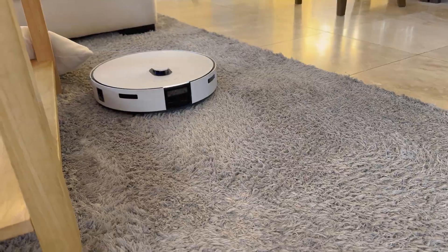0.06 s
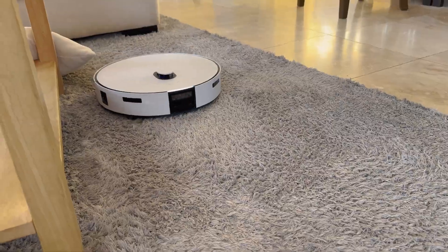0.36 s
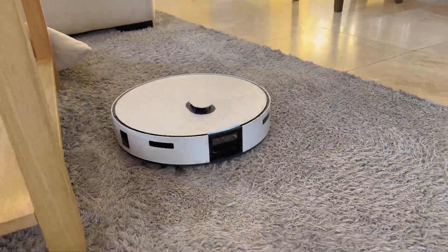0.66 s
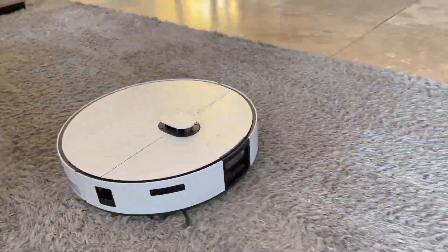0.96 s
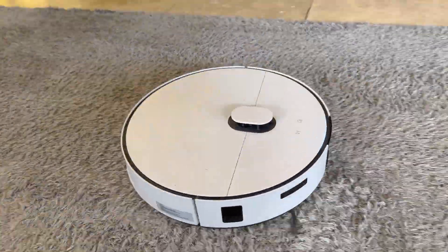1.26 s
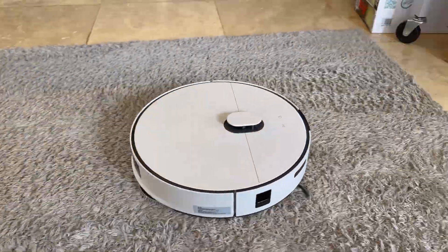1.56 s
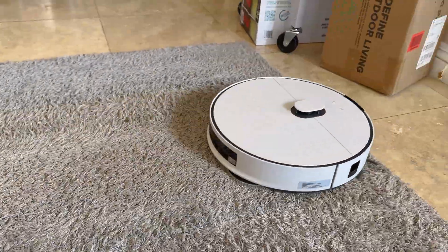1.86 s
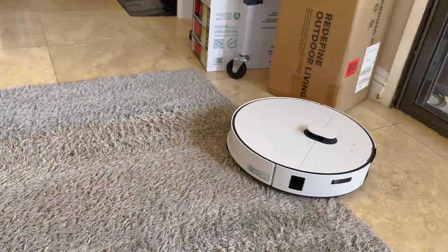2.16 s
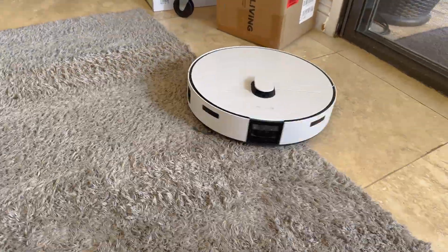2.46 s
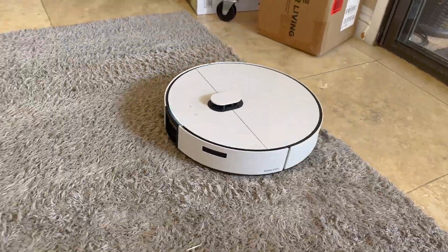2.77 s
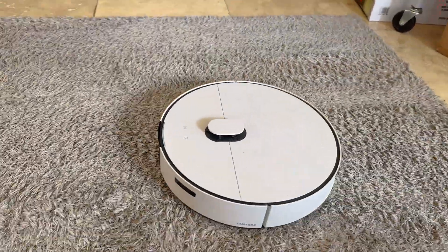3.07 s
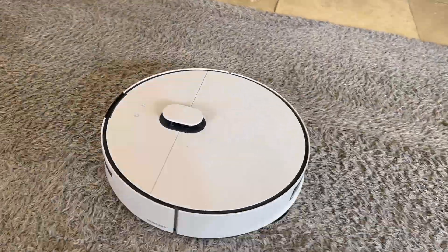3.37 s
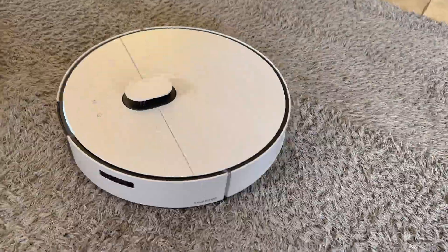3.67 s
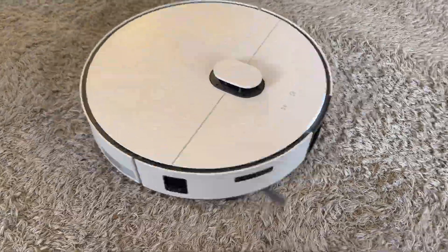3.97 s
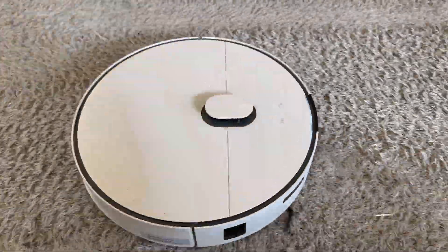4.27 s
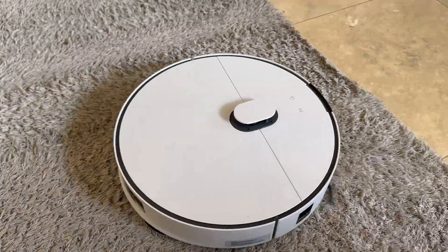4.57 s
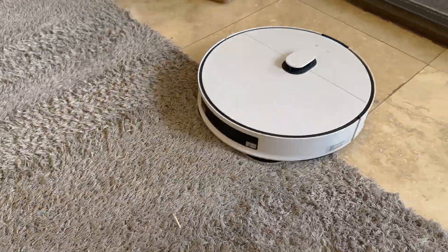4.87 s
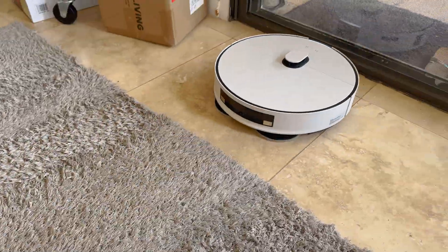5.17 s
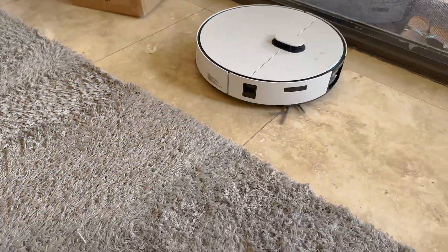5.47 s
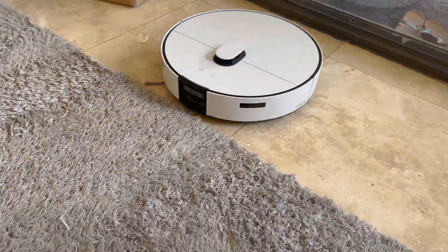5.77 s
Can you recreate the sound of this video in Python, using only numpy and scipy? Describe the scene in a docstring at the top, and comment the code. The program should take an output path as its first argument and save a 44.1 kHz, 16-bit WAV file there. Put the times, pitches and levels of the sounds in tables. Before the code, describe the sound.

A quiet, low appliance hum is heard for the first half second, then cuts abruptly to a robot vacuum about a metre away in a room, slightly to the right. Its steady rush of air and hiss continues to the end, with a thin high fan whine, breathy gliding whistles and a faint brush motor hum. From about 1 to 2.4 seconds the wheels thud softly on the rug, and sharp ticks of grit go up the intake until 2 seconds. At about 2.1 seconds the whine drops as the robot rolls onto tile, rising again at 2.7 as it returns and the exhaust hiss swells. The whir is closer around 3.7 seconds. More grit clicks between 4.2 and 4.7 seconds, sharpest near 4.4. At about 5 seconds the whine drops again with a soft bump, and the hiss sweeps as the robot turns on tile until 6 seconds.

```python
"""Robot vacuum on rug and tile

A low appliance hum gives way abruptly to a robot vacuum driving over a rug and twice out onto tile. Its fan
whines, faster on the rug; turbulent air roars in the ducts, rings the gap under the shell and whistles along
the floor. The exhaust hiss swells and sweeps as the robot turns. The brush motor hums, the bristles flutter,
soft thuds come and go, and grit ticks up the intake."""
import sys
import numpy as np
from scipy import signal
from scipy.fft import rfft, irfft, next_fast_len
from scipy.io import wavfile

SR = 44100
rng = np.random.default_rng(int(sys.argv[2]) if len(sys.argv) > 2 else 0)


def store_wav(level_fs):
    """Save 16-bit WAV to argv[1]."""
    pcm = np.round(np.clip(np.atleast_2d(level_fs), -1, 1) * 32767)
    wavfile.write(sys.argv[1], SR, pcm.T.astype(np.int16))


N = 264688
TIME = np.arange(N) / SR


def from_db(db):
    """Amplitude ratio: tenfold for every 20 dB."""
    return 10 ** (np.asarray(db) / 20)


def rms_one(x):
    """Normalisation to unit power."""
    return x / np.sqrt(np.mean(np.abs(x) ** 2) + 1e-20)


def in_time(rows):
    """Linear interpolation of each column at every sample."""
    s, *columns = np.transpose(rows)
    return [np.interp(TIME, s, c) for c in columns]


def at_hz(rows, hz):
    """Interpolation of each column on a log-frequency axis."""
    points, *columns = np.transpose(rows)
    return [np.interp(np.log(np.maximum(hz, 1)), np.log(points), c) for c in columns]


def step(at_s, ramp_s):
    """A smooth transition from 0 to 1."""
    return .5 + .5 * np.tanh((TIME - at_s) / ramp_s)


def phase_of(hz):
    """Phase is the time integral of frequency."""
    return 2 * np.pi * np.cumsum(hz + np.zeros(N)) / SR


def delayed(x, lag_samples):
    """Propagation delay over a changing path."""
    return np.array([np.interp(np.arange(N) - lag_samples, np.arange(N), port) for port in x])


def drift(rate_hz):
    """Low-pass Gaussian noise: a smooth fluctuation of spread 1."""
    stride, settle = 8, 4000
    pole = np.exp(-2 * np.pi * stride * rate_hz / SR)
    white = rng.standard_normal(N // stride + settle + 2)
    slow = signal.lfilter([1], [1, -2 * pole, pole * pole], white)[settle:]
    return np.interp(np.arange(N) / stride, np.arange(len(slow)), rms_one(slow))


def at_ports(right, diffuse, ports, hz):
    """Partial coherence: the left microphone port mixes the right's wave with diffuse sound."""
    balance_db, coherence, lead = at_hz(ports, hz)
    coherence = np.clip(coherence, 0, 1)
    left = coherence * np.exp(1j * lead) * right + np.sqrt(1 - coherence ** 2) * diffuse
    return np.array([from_db(balance_db) * left, right])


def noise(spectrum, ports):
    """Spectrally shaped stereo noise, rms 1 on the right."""
    size = next_fast_len(N, real=True)
    hz = np.arange(size // 2 + 1) * SR / size
    right, diffuse = rfft(rng.standard_normal((2, size))) * from_db(at_hz(spectrum, hz)[0])
    pair = irfft(at_ports(right, diffuse, ports, hz), size)[:, :N]
    return pair / np.std(pair[1])


def tone(hz, ports, scatter, rate_hz):
    """Multipath fading: reflections make a tone's level and phase wander at each port."""
    balance_db, _, lead = at_hz(ports, np.mean(hz))
    phase = phase_of(hz)
    left, right = [(1 + scatter * drift(rate_hz)) * np.cos(phase + shift + scatter * drift(rate_hz))
                   for shift in (lead, 0)]
    return np.array([from_db(balance_db) * rms_one(left), rms_one(right)])


# echoes off floor and furniture: delay_s, relative_db
REFLECTIONS = [(.0011, -12), (.0029, -11.5), (.0047, -28), (.0083, -9)]

def echoes(x, strength_db, wander=0.0433):
    """Comb filtering by short echoes, whose paths change as robot and listener move."""
    out, power = x.copy(), 1
    for delay_s, level_db in REFLECTIONS:
        gain = from_db(level_db + strength_db)
        out += gain * delayed(x, delay_s * SR * (1 + wander * drift(.25)))
        power += gain ** 2
    return out / np.sqrt(power)


# motor rumble: frequency_hz, density_db
RUMBLE_SPECTRUM = [(25, -29), (60, -7), (110, -5.5), (190, -4.5), (260, 0), (330, -2.5), (420, 8.5),
                   (520, 2.5), (800, -1), (1250, -8), (2100, -10.5), (2750, -16.5), (3300, -13),
                   (4300, -12.5), (7200, -19), (12500, -33), (14500, -48)]
# motor tones: pitch_hz, level_db
MOTOR_TONES = [(74, -67), (150.7, -62), (243, -56), (293.6, -58), (441.4, -50.5), (570.4, -60), (621, -64),
               (701, -63), (732, -51.5), (823.6, -62), (1109, -68), (1707, -63.5), (2121, -64.5),
               (3828, -66), (3898, -66), (5082, -69), (7154, -70)]
# stereo image: frequency_hz, left_minus_right_db, coherence, left_lead_rad
APPLIANCE_IMAGE = [(148, -11, 0.6, 2), (298, -6, 1, 0.5), (424, -4.5, 1, 0.7), (750, -9, 0.37, 1.6),
                   (1740, -3, 0.48, 3.5), (2940, -8.5, 0.19, -3), (6700, -13, 0.25, 10),
                   (10850, 0.5, 1, 1.3)]

def appliance():
    """A motor radiates a line spectrum of unsteady tones over a broadband rumble."""
    tones = sum(from_db(level_db) * tone(hz, APPLIANCE_IMAGE, scatter=0.38, rate_hz=13)
                for hz, level_db in MOTOR_TONES)
    return from_db(-44) * echoes(noise(RUMBLE_SPECTRUM, APPLIANCE_IMAGE), strength_db=-8) + tones


# stereo image of room hum and robot: frequency_hz, left_minus_right_db, coherence, left_lead_rad
ROBOT_IMAGE = [(124, -4, 1, 1), (256, 3, 0.8, -1.5), (404, -6, 0.62, 1.5), (770, -9.5, 1, -2.5),
               (920, -22, 0.66, 1.5), (1070, -13.5, 0.5, 1.9), (1190, -9.5, 1, 0.67), (1380, -7.5, 1, 0.88),
               (2250, -6, 0.97, 0.5), (3300, -6.5, 0.82, 1.33), (5200, -8, 0, 0.5), (8840, -9, 0.7, 4.5),
               (10500, -7.5, 1, 4.5), (12600, -11.5, 0.8, 5), (16100, -7.5, 0.45, 2)]

def room_hum(tile, pitch_hz=151, level_db=-81, tile_rise_db=3):
    """A faint tone with slow multipath fading, stronger toward the tiled side."""
    gain = from_db(level_db + tile_rise_db * tile)
    return gain * tone(pitch_hz, ROBOT_IMAGE, scatter=0.46, rate_hz=0.49)


# robot to listener: time_s, distance_m
RANGE = [(.5, 1.3), (.75, 1.17), (1.22, 0.88), (1.6, 1.02), (1.95, 1.15), (2.22, 1.15), (2.65, 1.58),
         (3.0, 1.22), (3.65, 0.74), (4.35, 0.85), (4.62, 0.98), (4.88, 0.91), (5.08, 1.02), (5.3, 0.93),
         (5.52, 1.01), (5.7, 0.9), (6.0, 1.21)]
# trips onto tile: leave_rug_s, back_on_rug_s, brush_hum_db
TILE_VISITS = [(2.083, 2.7, -78.5), (4.94, 6.005, -66.5)]
# turns that show the exhaust, side brush or rear vents: centre_s, half_length_s, squareness
EXHAUST_VIEWS = [(2.8, 0.49, 0.99), (5.42, 0.47, 0.15), (6.0, 0.08, 0.85)]
BRUSH_VIEWS = [(1.3, 0.13, 0.1), (1.85, 0.27, 0.95), (4.55, 0.38, 0.8)]
REAR_VIEWS = [(3.05, 0.04, 0.2), (3.62, 0.42, 0.4), (4.76, 0.11, 0.12)]
LEAVE_S, RETURN_S = .07, .05   # the motors ease off and pick up

def drive():
    """Source geometry, or pose: distance, share on tile, and how squarely each side is in view."""
    tile = sum(step(leave_s, LEAVE_S) * (1 - step(back_s, RETURN_S))
               for leave_s, back_s, _ in TILE_VISITS)
    views = [sum(share * np.exp(-((TIME - s) / half_s) ** 2) for s, half_s, share in turns)
             for turns in (EXHAUST_VIEWS, BRUSH_VIEWS, REAR_VIEWS)]
    return in_time(RANGE)[0], tile, *views


def radiated(levels, pose, falloff=1, beam=1):
    """Directivity and spreading loss; a larger beam narrows the exhaust's lobe."""
    rug_db, tile_db, exhaust_db, brush_db, rear_db = levels
    metres, tile, exhaust, brush, rear = pose
    directivity_db = exhaust_db * exhaust ** beam + brush_db * brush + rear_db * rear
    return from_db(rug_db + tile_db * tile + directivity_db) / metres ** falloff


# soft thuds: start_s, level_db
THUDS = [(0.971, -54.5), (1.035, -55), (1.28, -53.5), (1.345, -56), (1.41, -57), (1.761, -59),
         (1.83, -56.5), (1.975, -53), (2.024, -60), (2.17, -60), (2.355, -56), (3.295, -60), (4.66, -64),
         (5.02, -57), (5.31, -60)]
# their spectrum: frequency_hz, density_db
THUD_SPECTRUM = [(50, -26), (150, -22), (270, 6), (400, 3), (650, 6), (1100, -5), (2500, -34)]
# their stereo image: frequency_hz, left_minus_right_db, coherence, left_lead_rad
THUD_IMAGE = [(200, 7, 0.18, 0), (1000, 0, 0.54, 0)]

def soft_thuds(attack_s=0.0023, decay_s=0.017):
    """Soft, dull, heavily damped thuds, deepest and strongest at the left port."""
    envelope = sum(from_db(level_db) * step(s, attack_s) * np.exp(-np.maximum(TIME - s, 0) / decay_s)
                   for s, level_db in THUDS)
    return envelope * noise(THUD_SPECTRUM, THUD_IMAGE)


def ring(x, hz, t60_s):
    """A damped mode that radiates no deep bass; a unit impulse rings it at height 1."""
    pole, angle = from_db(-60 / (t60_s * SR)), 2 * np.pi * hz / SR
    numerator = np.array([1, -2, 1]) / (2 * np.tan(angle / 2))
    return signal.lfilter(numerator, [1, -2 * pole * np.cos(angle), pole * pole], x + 1e-18)


# grains hitting the intake: start_s, peak_db, ring_hz, knock_db
GRAINS = [(.5325, -35, 5500, -50), (.9585, -25.5, 2400, -33), (1.2052, -23, 2200, -31),
          (1.3306, -31, 3070, -34), (1.3325, -25.5, 7000, -50), (1.378, -28, 5400, -48),
          (1.4032, -23, 3600, -32.5), (2.0212, -28, 9000, -38), (2.0268, -20, 6100, -43),
          (2.0270, -17.5, 9100, -28), (4.245, -31, 6500, -48), (4.2989, -23, 5200, -36),
          (4.378, -29, 5800, -48), (4.4423, -15.5, 5000, -26), (4.659, -31, 6200, -40),
          (5.8104, -31, 6000, -57)]
# plastic shell: pitch_hz, gain_db, t60_s
SHELL_MODES = [(318, -30, 0.035), (560, -27, 0.13), (985, -25, 0.14), (1420, -4.5, 0.037),
               (2120, -5, 0.011), (2720, -3, 0.018), (4330, -17, 0.0063)]

def grit(crack_s=.00045, ring_s=0.0014, tail_db=-23, tail_s=0.011, echo_s=.0021, echo_db=-10):
    """Impact excitation: each grain cracks, with a faint scatter and floor echo, and rings the shell."""
    t = TIME[:SR // 16]
    cracks, knocks = np.zeros((2, N + len(t))), np.zeros(N)
    envelope = np.exp(-t / crack_s) + from_db(tail_db) * np.exp(-t / tail_s)
    for start_s, peak_db, hz, knock_db in GRAINS:
        at = round(start_s * SR)
        dull = signal.butter(3, min(1.7 * hz, 10500), fs=SR, output="sos")   # bigger grains are duller
        crack = signal.sosfilt(dull, ring(rng.standard_normal((2, len(t))) * envelope, hz, ring_s))
        cracks[:, at:at + len(t)] += from_db(peak_db) * crack / np.abs(crack).max(axis=1, keepdims=True)
        knocks[at] = from_db(knock_db)
    cracks += from_db(echo_db) * np.roll(cracks, round(echo_s * SR), axis=1)
    # finite contact time dulls the knock
    knocks = signal.sosfilt(signal.butter(2, 3000, fs=SR, output="sos"), knocks)
    shell = sum(ring(knocks * from_db(gain_db), hz, t60_s) for hz, gain_db, t60_s in SHELL_MODES)
    return (cracks[:, :N] + shell) * from_db([[-7], [0]])


def brush_motor(metres, tile, rug_hz=192.6, tile_hz=169.4, drag=.025, clear_s=0.15):
    """Frictional loading: the pile drags and muffles the brush; clear of the rug it hums steadily."""
    wobble = drag * (1 - tile) * drift(1.2) + 0.0015 * drift(5.9)
    speed_hz = (rug_hz + (tile_hz - rug_hz) * tile) * (1 + wobble)
    hum, overtone = from_db(-77), from_db(-65) / metres
    for leave_s, back_s, hum_db in TILE_VISITS:
        clear = step(leave_s + clear_s, RETURN_S) * (1 - step(back_s - clear_s, RETURN_S))
        hum = hum + from_db(hum_db) * clear
    return sum(gain * tone(order * speed_hz, ROBOT_IMAGE, scatter=0.2, rate_hz=6.8)
               for order, gain in ((2, hum), (4, overtone)))


def resonance(hz, width_hz):
    """A resonance driven by turbulence gives narrow-band noise about its centre."""
    carrier = np.exp(1j * phase_of(hz))
    right, diffuse = [(drift(width_hz) + 1j * drift(width_hz)) * carrier for _ in range(2)]
    return np.real(at_ports(right, diffuse, ROBOT_IMAGE, np.mean(hz)))


def glide(width_hz, curve, fade_s=.02):
    """A swept resonance fades in, slides in pitch and fades out."""
    hz, level_db = in_time(curve)
    sounding = step(curve[0][0], fade_s) * (1 - step(curve[-1][0], fade_s))
    return sounding * from_db(level_db) * resonance(hz, width_hz)


# gap modes: pitch_hz, width_hz, rug_at_1m_db, then the changes tile_db, exhaust_db, brush_db, rear_db
GAP_RESONANCES = [(1307, 52, -59.5, -0.5, 4, 11, 16), (1635, 34, -60, 0.5, 2, 5.5, 3),
                  (2007, 59, -52.5, -28, -13, -13, -4)]
# breathy whistles: width_hz, [(time_s, pitch_hz, level_db)]
SEAL_WHISTLES = [(150, [(.45, 4300, -57), (.62, 4530, -53), (.85, 4640, -48.5), (.96, 4350, -52),
                 (1.06, 4020, -49.5), (1.55, 3930, -46.8), (2.0, 3740, -51)]), (50, [(.48, 2210, -53),
                 (.65, 2190, -48), (.9, 2100, -52), (1.2, 1990, -50)]), (400, [(1.12, 4950, -59),
                 (1.35, 5050, -49), (1.45, 4900, -55), (2.1, 4850, -58)]), (260, [(2.26, 2850, -49),
                 (2.55, 2550, -50), (2.85, 2450, -51)]), (180, [(2.74, 3700, -56), (2.87, 4040, -48),
                 (3.12, 4060, -45.5), (3.3, 3920, -49), (3.55, 3760, -52)]), (60, [(3.68, 3900, -58),
                 (3.82, 4150, -54), (3.9, 4370, -48.5), (3.96, 4400, -50.5)]), (170, [(4.04, 3930, -52),
                 (4.4, 4050, -49), (4.62, 4300, -46), (4.8, 4620, -44.5), (4.92, 4500, -55)]),
                 (70, [(4.72, 1330, -51), (4.86, 1430, -50), (4.96, 1630, -47), (5.08, 1690, -53)]),
                 (45, [(2.3, 1620, -57), (2.65, 1640, -50), (2.9, 1680, -54)]), (70, [(2.76, 1400, -54),
                 (2.9, 1320, -49), (3.1, 1270, -52)]), (130, [(4.95, 4000, -53), (5.05, 3700, -54),
                 (5.14, 3000, -54), (5.32, 2800, -52)]), (210, [(5.58, 3000, -53), (5.7, 3080, -48),
                 (5.82, 3100, -52)]), (170, [(5.72, 2850, -54), (5.82, 2580, -48), (5.89, 2200, -45.5),
                 (6.04, 2000, -48)]), (260, [(5.78, 3850, -52), (5.815, 4050, -48.5), (5.85, 4800, -51),
                 (5.91, 5150, -51), (6.04, 5280, -48)]), (80, [(5.87, 1660, -51), (6.04, 1620, -50)])]

def under_shell(pose):
    """Flow excites the gap's resonances; whistles glide as the intake's seal with the floor changes."""
    modes = sum(radiated(levels, pose, falloff=0.86) * resonance(hz, width_hz)
                for hz, width_hz, *levels in GAP_RESONANCES)
    whistles = sum(glide(width_hz, curve) for width_hz, curve in SEAL_WHISTLES)
    return signal.sosfilt(signal.butter(2, 500, "high", fs=SR, output="sos"), modes + whistles)


# floor echo as the robot turns by the tile: time_s, notch_hz, echo_gain
FLOOR_NOTCH = [(2.7, 3400, 0), (2.85, 3000, 0.3), (3.0, 2280, 0.22), (3.15, 2000, 0), (4.95, 1600, 0.12),
               (5.2, 2090, 0.35), (5.45, 2420, 0.49), (5.62, 2300, 0.3), (5.8, 1650, 0.27),
               (5.9, 1510, 0.3)]

def off_floor(x):
    """Destructive interference: the floor echo is half a cycle late at the notch."""
    notch_hz, gain = in_time(FLOOR_NOTCH)
    return (x + gain * delayed(x, SR / (2 * notch_hz))) / np.sqrt(1 + gain ** 2)


# notches that slide as the robot turns: width_hz, [(time_s, centre_hz, depth)]
SLIDING_NOTCHES = [(454, [(5.28, 3550, 0.13), (5.42, 3420, 0.4), (5.55, 3400, 0.5), (5.62, 3500, 0.2)]),
                   (900, [(5.15, 5200, 0.18), (5.45, 4900, 0.45), (5.72, 5400, .45), (5.86, 5700, 0.25)]),
                   (595, [(5.82, 3500, 0), (5.9, 3050, 0.2), (6.0, 2850, 0.2)]), (800, [(2.1, 4900, 0),
                   (2.35, 4670, 0.5), (2.68, 4380, 0.15), (2.8, 4500, 0.2)]), (500, [(2.7, 3500, 0),
                   (2.9, 3100, 0), (3.4, 3000, 0.47), (4.35, 3020, 0.42), (4.8, 3080, 0.2)])]

def notched(x):
    """Interference: reflections partly cancel narrow bands of the rush."""
    for width_hz, curve in SLIDING_NOTCHES:
        hz, depth = in_time(curve)
        carrier = np.exp(1j * phase_of(hz))
        band = signal.sosfiltfilt(signal.butter(1, width_hz / 2, fs=SR, output="sos"), x / carrier)
        x = x - np.clip(depth, 0, 1) * 2 * np.real(band * carrier)
    return x


# highest treble at the left port: time_s, gain_db
LEFT_TREBLE = [(.6, 0), (1.8, -4), (2.1, 3), (2.5, 7), (3.0, 3), (3.4, 7), (3.85, 3), (4.15, -4),
               (4.65, -6), (4.9, 7), (5.45, 4), (5.8, 9)]

def shadowed(x, edge_hz=12300):
    """Acoustic shadow: the shortest waves reach the left port more or less freely with angle."""
    top = signal.sosfiltfilt(signal.butter(8, edge_hz, "high", fs=SR, output="sos"), x)
    gain = from_db(np.outer([1, 0], in_time(LEFT_TREBLE)[0]))
    return x + top * (gain - 1)


# spectra of the air noise: frequency_hz, density_db
INTAKE_SPECTRUM = [(40, -60), (90, -55), (140, -24), (200, -13), (260, -9), (350, -3), (470, 1.5),
                   (600, 0.5), (780, 4), (1000, 5), (1150, -6), (1500, -46)]
DUCT_SPECTRUM = [(900, -48), (1130, 0), (1280, -6), (1420, 4.5), (1520, -2), (1640, 1.5), (1810, 0.5),
                 (2020, 4.5), (2400, 3), (2800, -1), (3300, 0), (4000, -15.5), (5000, -7.5), (8000, -33)]
HISS_SPECTRUM = [(2000, -47), (3300, 6), (4000, 11.5), (4700, 7), (6000, 5.5), (7500, 2), (9500, -2),
                 (11500, -23), (14000, -10.5)]
JET_SPECTRUM = [(2500, -25), (5500, -3.5), (7500, 8), (8700, 6), (10300, 6.5), (11500, -2.5), (13000, -22),
                (16000, -38)]
SIZZLE_SPECTRUM = [(8000, -43), (11000, -1.5), (12300, -3.5), (13700, -8), (14700, -3), (15600, -7),
                   (17000, -6.5)]
# its levels: rug_at_1m_db, then the changes tile_db, exhaust_db, brush_db, rear_db
INTAKE_DB = (-55.5, -2.5, 3, 2, 2.5)
DUCT_DB = (-42.5, -1.5, 6.5, 0.5, -5.5)
JET_DB = (-52.5, -0.5, 11, 0.5, -7.5)
SIZZLE_DB = (-54.5, -0.5, 7, 4.5, -10)
# suction hiss: time_s, level_db
HISS_CURVE = [(.5, -50), (.9, -54), (1.1, -45.5), (1.37, -48.5), (1.5, -46.5), (1.95, -44.5), (2.2, -46.5),
              (2.5, -48.5), (2.68, -51), (2.85, -54), (3.25, -44), (3.6, -43.5), (4.0, -47), (4.35, -44),
              (4.7, -44.5), (5.05, -43), (5.3, -46.5), (5.5, -44), (5.6, -45), (5.75, -43), (6.0, -46)]
# bright peaks as vent or brush sweeps past: width_hz, left_lift_db, [(time_s, centre_hz, level_db)]
HISS_SWEEPS = [(650, -3, [(2.55, 10700, -58), (2.8, 11340, -47.5), (2.98, 10100, -54), (3.2, 9400, -53)]),
               (420, -2, [(2.3, 8520, -56), (2.72, 8700, -56), (2.98, 8170, -50), (3.25, 7900, -68)]),
               (500, 5, [(2.52, 8500, -71), (2.7, 9200, -54), (2.82, 9800, -58), (2.93, 10200, -66)]),
               (500, 14, [(2.68, 4300, -70), (2.88, 4660, -65), (3.08, 5520, -63), (3.22, 5700, -68)]),
               (450, -13, [(2.45, 5870, -59), (2.7, 6100, -51), (2.95, 6060, -60)]),
               (450, 0, [(4.86, 9400, -59), (4.9, 9450, -52), (4.98, 8900, -58)]),
               (500, -6, [(5.3, 10430, -57), (5.5, 9830, -52), (5.75, 9450, -63), (5.96, 8760, -49),
               (6.04, 8700, -49)])]

def airflow(pose):
    """Turbulence radiates broadband noise from the intake, ducts, bristles and exhaust jet."""
    intake = radiated(INTAKE_DB, pose, falloff=0.98) * noise(INTAKE_SPECTRUM, ROBOT_IMAGE)
    duct = radiated(DUCT_DB, pose, falloff=2.05) * noise(DUCT_SPECTRUM, ROBOT_IMAGE)
    hiss = from_db(in_time(HISS_CURVE)[0]) * noise(HISS_SPECTRUM, ROBOT_IMAGE)
    jet = radiated(JET_DB, pose) * noise(JET_SPECTRUM, ROBOT_IMAGE)
    sizzle = radiated(SIZZLE_DB, pose, beam=6.7) * noise(SIZZLE_SPECTRUM, ROBOT_IMAGE)
    # long waves are combed alike at both ports, short waves differently at each
    low = echoes(intake + off_floor(duct), strength_db=-3)
    high = np.vstack([echoes(port[None], strength_db=2) for port in hiss + jet + sizzle])
    sweeps = sum(from_db([[left_db], [0]]) * glide(width_hz, curve)
                 for width_hz, left_db, curve in HISS_SWEEPS)
    return notched(low + shadowed(high)) + sweeps


def bristle_flutter(chop_hz=40.1, depth_db=.25, jitter_db=.5):
    """Amplitude modulation: the brush rows chop the air a little."""
    return from_db(depth_db * np.sin(2 * np.pi * chop_hz * TIME) + jitter_db * drift(18))


# whine, waxing and waning as the robot turns: order, [(time_s, level_db)]
FAN_ORDERS = [(1, [(.5, -56), (1.2, -50.5), (1.8, -52), (2.1, -65), (2.6, -63), (2.95, -50.5), (3.7, -45),
              (4.2, -49), (4.8, -46), (5.05, -61), (6.0, -61.5)]), (3, [(.5, -52.5), (.7, -60),
              (1.0, -53.5), (1.15, -49.5), (1.6, -51), (1.92, -47.5), (2.25, -54.5), (2.5, -53), (2.7, -57),
              (3.2, -57), (3.45, -52.5), (3.85, -48), (4.25, -48.5), (4.4, -49), (4.65, -51.5), (5.1, -55),
              (5.4, -64), (5.75, -55), (6.0, -61)]), (7, [(.75, -71), (.9, -56), (1.05, -67), (2.5, -63),
              (2.8, -50), (3.0, -47), (3.25, -61), (3.5, -57), (3.7, -70), (4.0, -60), (4.3, -70),
              (4.6, -54), (4.85, -68), (5.35, -59), (5.85, -67)]), (8, [(.95, -75), (1.15, -62), (1.5, -64),
              (2.2, -72), (2.38, -55), (2.55, -64), (2.9, -58), (3.25, -54), (3.55, -66), (3.95, -70),
              (4.3, -63), (4.55, -60), (4.85, -64), (5.1, -55), (5.5, -67), (5.93, -53)])]

def fan_whine(tile, rug_hz=1214.8, tile_hz=1066.5, dip_db=-13):
    """Harmonics of the impeller's rotation: fast on the rug, slower on tile, weak and unsteady between."""
    changing = 4 * tile * (1 - tile)
    speed_hz = rug_hz + (tile_hz - rug_hz) * tile
    speed_hz = speed_hz * (1 + .0004 * drift(12)) + 6 * changing * drift(40)
    whine = 0
    for order, curve in FAN_ORDERS:
        harmonic = tone(order * speed_hz, ROBOT_IMAGE, scatter=.2 + .05 * order, rate_hz=18)
        whine += from_db(in_time(curve)[0]) * harmonic
    return from_db(dip_db * changing) * whine


# left port as the listener swings to follow the robot: time_s, gain_db
LEFT_GAIN = [(.6, 1.5), (1.2, 1), (1.7, 0.5), (2.2, 0), (2.7, 2.5), (3.1, -1.3), (3.8, 0.7), (5.3, 0)]

def scene(robot_in_s=.455, crossfade_s=.004):
    """Superposition: the robot's sources and a faint room hum take over from the appliance."""
    pose = drive()
    metres, tile = pose[:2]
    flutter = bristle_flutter()
    hum = room_hum(tile)
    air = (airflow(pose) + under_shell(pose)) * flutter
    robot = air + fan_whine(tile) + brush_motor(metres, tile) + grit() + soft_thuds() + hum
    robot *= from_db(np.outer([1, 0], in_time(LEFT_GAIN)[0]))
    # so small a body radiates no deep bass
    robot = signal.sosfilt(signal.butter(3, 70, "high", fs=SR, output="sos"), robot)
    robot_in = np.clip((TIME - robot_in_s) / crossfade_s + .5, 0, 1)
    return (1 - robot_in) * appliance() + robot_in * robot


def record(dry, cutoff_hz=15900):
    """Band limiting: a steep low-pass cuts the top."""
    return signal.sosfilt(signal.ellip(12, .1, 80, cutoff_hz, fs=SR, output="sos"), dry)


dry = scene()
out = record(dry)
store_wav(out)
```